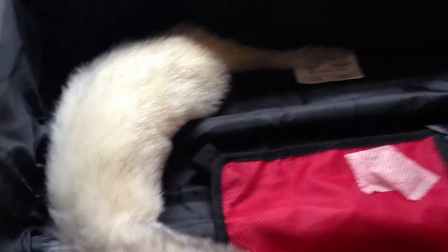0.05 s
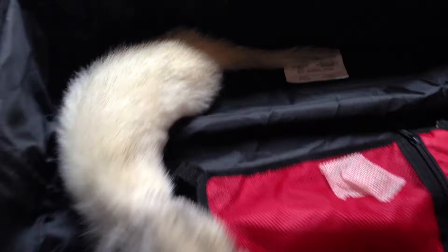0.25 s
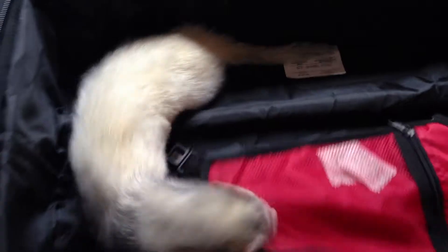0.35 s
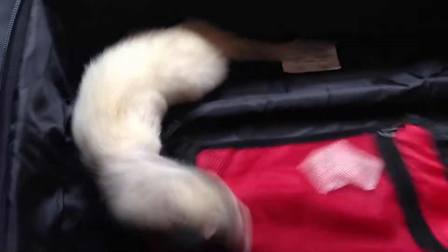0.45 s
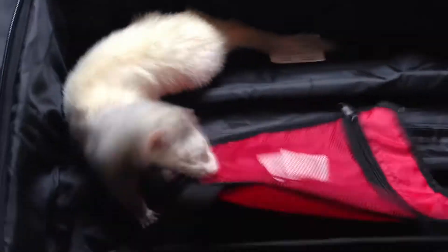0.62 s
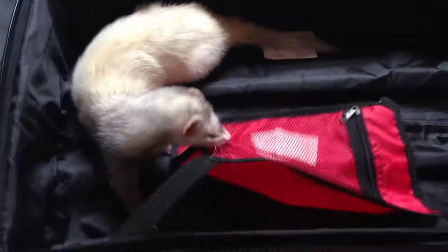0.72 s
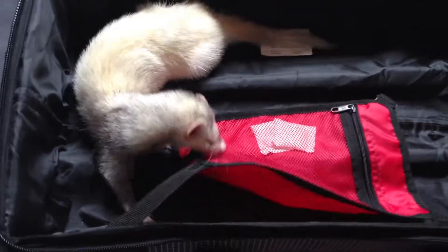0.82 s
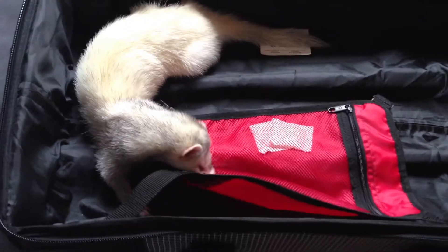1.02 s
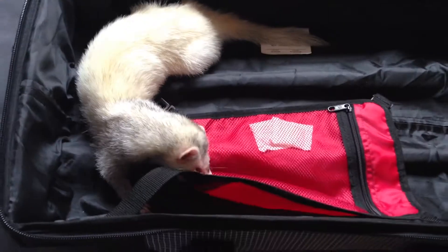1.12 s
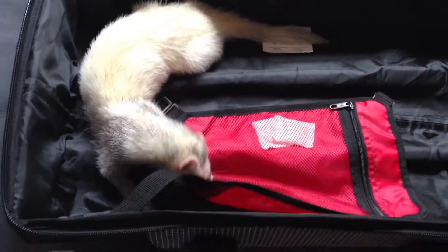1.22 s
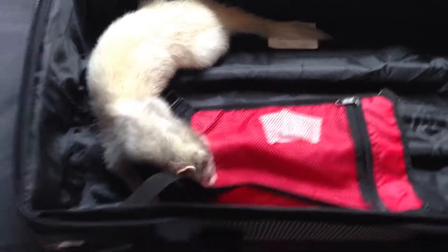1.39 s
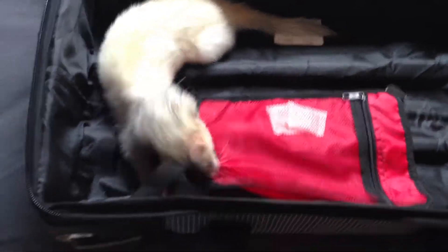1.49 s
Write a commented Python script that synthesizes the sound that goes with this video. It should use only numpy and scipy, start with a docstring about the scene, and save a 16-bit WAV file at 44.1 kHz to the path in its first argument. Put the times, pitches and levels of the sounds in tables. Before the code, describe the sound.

A ferret scrabbles over the nylon lining of a suitcase, with soft scuffs, claw ticks and tiny fabric squeaks. A quick cluster of light, hollow knocks follows, then the movement fades, heard up close in a quiet room.

```python
"""Ferret in a suitcase

A ferret rummages in an open suitcase, close by, in a quiet room. Claws tick on the fabric,
its body scuffs the nylon lining in short strokes, the ribbed weave squeaks, and paws and the
pocket flap knock on the shell. The room adds a short tail over a faint steady hiss."""
import sys
import numpy as np
from scipy import signal
from scipy.fft import rfft, irfft, next_fast_len
from scipy.io import wavfile

SR = 44100
rng = np.random.default_rng(int(sys.argv[2]) if len(sys.argv) > 2 else 0)


def transcribe(u):
    """Save the signal u as a 16-bit wav file named by the first command-line argument.

    u: samples, shape (n,) or (channels, n), limited to [-1, 1]; the rate is SR.
    q: integer samples, one column per channel.
    """
    v = np.clip(np.atleast_2d(u).T, -1, 1)
    q = np.round(v * 32767).astype(np.int16)
    wavfile.write(sys.argv[1], SR, q)


N = 68355

# claw ticks and taps: t/s, level/dB, f/Hz, t60/s
CLAW_TICKS = [(.102, -44.5, 4520, 0.0041), (.132, -42.5, 3970, 0.0051), (0.1638, -44, 6300, 0.0026),
              (.2185, -48, 1100, 0.011), (0.4255, -28.5, 3200, 0.0031), (0.4412, -28, 3650, .003),
              (0.6042, -34, 3660, 0.0061), (1.0315, -51, 1380, 0.021), (1.074, -51.5, 2960, 0.011),
              (1.323, -51, 3780, 0.016)]
# partials of a tick: f/pitch, level/dB
TICK_PARTIALS = [(.58, -4), (1, -1.5), (1.37, -5)]
# strokes over the lining: peak t/s, rise/s, fall/s, level/dB, panel trim/dB, sheen trim/dB
STROKES = [(0.147, 0.027, .025, -67.5, 2.5, 7.5), (0.219, .017, 0.011, -57, -6, -6),
           (.247, 0.032, 0.032, -52, -23, 2), (.345, 0.03, 0.024, -53.5, -1, 1),
           (0.424, 0.037, 0.031, -44.5, -7.5, -2), (0.468, 0.0087, 0.024, -39.5, 5.5, 3),
           (.502, 0.01, 0.021, -49.5, 10, -2), (0.536, 0.01, 0.014, -54, 13, 10),
           (0.57, 0.013, 0.025, -46, 2.5, 1), (0.631, 0.02, .017, -49.5, -14, 1),
           (0.667, 0.0034, 0.0078, -47, 9, 1.5), (.70, 0.014, 0.033, -52, 9, 4.5),
           (0.726, 0.012, 0.021, -46.5, 0, 0), (.78, 0.029, 0.026, -53.5, -1, 5.5),
           (0.834, 0.037, 0.046, -60.5, -20, 4.5), (1.055, .015, 0.016, -73, 11, -18),
           (1.297, 0.016, 0.011, -62.5, -9, -1), (1.325, 0.019, 0.015, -61, -18, 3.5),
           (1.41, 0.039, 0.013, -66, -25, 4), (1.545, 0.033, 0.032, -60, -10, 0)]
# nylon squeaks: peak t/s, half length/s, level/dB, f/Hz
NYLON_SQUEAKS = [(0.26, 0.019, -57.5, 2540), (0.326, .004, -54, 8300), (.553, .009, -51, 9600),
                 (.649, 0.0028, -49, 9730), (.727, .011, -46, 9750), (0.798, 0.07, -58.5, 1830),
                 (1.038, 0.018, -65.5, 1576), (1.299, 0.0061, -57, 880)]
# knocks on the shell: t/s, level/dB, contact cutoff f/Hz, relative floor thump/dB
SHELL_KNOCKS = [(.286, -49, 806, -6.5), (0.4246, -33, 2400, 2), (0.4419, -41.5, 2470, -38),
                (.4620, -33.5, 5000, -19), (0.4656, -21.5, 4900, -36), (.5728, -21, 3760, -31),
                (0.6677, -25, 840, -8.5)]
# shell modes: f/Hz, level/dB, t60/s
SHELL_MODES = [(248, -21.5, 0.069), (352.7, -8.5, 0.047), (482.5, -12.5, 0.036), (572, -19, 0.052),
               (731, -15, 0.038), (980, -13, 0.032), (1277, -10, 0.031), (1477, -10, 0.028),
               (2270, -3.5, 0.0057), (2727, -9, 0.0079), (4010, -11.5, 0.016), (4670, -0.5, 0.0067)]
# spectral shapes: f/Hz, level/dB
HISS_SHAPE = [(25, -20), (70, -1), (130, -4.5), (220, -4), (290, -0.5), (345, 4.5), (420, -2), (900, -2.5),
              (1800, -2), (4000, -3.5), (8000, -7.5), (15000, -9)]  # background
RUB_SHAPE = [(60, -39), (200, -35), (600, -6), (1100, -5), (1800, 0), (2300, 0), (2800, -1), (3400, -0.5),
             (4400, -2.5), (6500, -7.5), (10000, -14), (15000, -18.5)]  # rubbed nylon
PANEL_SHAPE = [(40, -41), (100, -10), (200, -10.5), (270, -3), (360, -0.5), (440, -3), (520, -0.5),
               (750, 1.5), (1100, -11.5), (1600, -5), (3000, -12), (15000, -48)]  # panel under the lining
SHEEN_SHAPE = [(60, -58), (2500, -45), (5500, 0.5), (8500, -3), (9700, -3), (11000, -3.5), (15000, -9)]  # hiss of the weave
CRACK_SHAPE = [(100, -24), (300, -5), (1300, 4.5), (4800, 0), (5800, -7), (15000, -12.5)]  # contact noise of a knock
ROOM_SHAPE = [(60, -26), (200, -9.5), (350, 1.5), (600, 2), (1100, 3), (1800, 0), (5000, -2), (15000, -1)]  # diffuse tail


def undb(db):
    """Decibels to gain."""
    return 10 ** (np.asarray(db) / 20)


def unit(x):
    """Scale to rms 1."""
    return x / np.sqrt(np.mean(x ** 2))


def colour(x, shape):
    """Minimum-phase filter through (f/Hz, level/dB) points."""
    size = next_fast_len(2 * N)
    hz, db = np.array(shape, float).T
    bins_hz = np.arange(size // 2 + 1) * SR / size
    log_gain = np.log(undb(np.interp(np.log(bins_hz + 1), np.log(hz), db)))
    cepstrum = irfft(log_gain, size)
    cepstrum[1:size // 2] *= 2
    cepstrum[size // 2 + 1:] = 0
    return irfft(rfft(x, size) * np.exp(rfft(cepstrum, size)), size)[:N]


def wander(rate_hz):
    """Smooth random curve, rms 1."""
    steps = np.arange(N) / SR * rate_hz
    return unit(np.interp(steps, np.arange(N), rng.standard_normal(N)))


def ring(t, hz, t60_s):
    """Struck mode: a decaying sine."""
    return np.sin(2 * np.pi * hz * t) * np.exp(-np.log(1000) * t / t60_s)


def add(out, start_s, x):
    """Mix x into out at start_s."""
    i = int(start_s * SR)
    out[i:i + len(x)] += x[:N - i]


def hiss(level_db=-64.5):
    """Faint steady background noise."""
    return undb(level_db) * unit(colour(rng.standard_normal(N), HISS_SHAPE))


def ticks(t):
    """A claw catches a thread or taps the lining: three fast-dying partials."""
    out, t = np.zeros(N), t[:SR // 12]
    for start_s, db, hz, t60_s in CLAW_TICKS:
        tick = sum((-1) ** k * undb(partial_db) * ring(t, hz * ratio, t60_s)
                   for k, (ratio, partial_db) in enumerate(TICK_PARTIALS))
        add(out, start_s, undb(db) * tick)
    return out


def friction(shape, snags_per_s=3500, spread_db=4.5, snag_share=0.41):
    """Threads snag and let go: dense uneven clicks over a smooth rub."""
    snags = (rng.random(N) < snags_per_s / SR) * rng.choice([-1, 1], N)
    snags = snags * undb(spread_db * np.minimum(rng.exponential(size=N), 4))
    grain = np.sqrt(snag_share) * unit(snags) + np.sqrt(1 - snag_share) * rng.standard_normal(N)
    return unit(colour(grain, shape))


def scuffs(t, panel_db=-7.5, sheen_db=-8, judder_db=1.16):
    """Each stroke rubs the nylon, drums the panel beneath and makes the weave hiss."""
    power = np.zeros((3, N))
    for peak_s, rise_s, fall_s, db, panel_trim_db, sheen_trim_db in STROKES:
        width_s = np.where(t < peak_s, rise_s, fall_s)
        swell = np.exp(-np.abs((t - peak_s) / width_s) ** 1.9)
        layer_db = db + np.array([0, panel_db + panel_trim_db, sheen_db + sheen_trim_db])
        power += swell * undb(layer_db[:, None]) ** 2
    layers = np.array([friction(RUB_SHAPE), friction(PANEL_SHAPE), friction(SHEEN_SHAPE)])
    stick_slip = undb(judder_db * wander(rate_hz=129.64))
    return (np.sqrt(power) * layers).sum(axis=0) * stick_slip


def squeaks(t, waver_hz=257):
    """Ribs of the weave zip over each other: a thin wavering whistle, higher on faster slides."""
    out = np.zeros(N)
    for peak_s, half_s, db, hz in NYLON_SQUEAKS:
        cycles = np.cumsum(hz + waver_hz * wander(rate_hz=700)) / SR
        swell = np.exp(-((t - peak_s) / half_s) ** 2)
        out += undb(db) * swell * np.sin(2 * np.pi * cycles)
    return out


def knocks(t, crack_s=0.0004, rattle_s=0.0093, low_cut_hz=270, thump_rise_s=0.002):
    """A blow rings the shell, shakes the lining and thumps the floor panel; soft ones lose treble."""
    out, t = np.zeros(N), t[:SR // 5]
    noise = unit(colour(rng.standard_normal(N), CRACK_SHAPE))
    burst = undb(-7.5) * np.exp(-t / crack_s) + undb(-12) * np.exp(-t / rattle_s)
    thump = ring(t, hz=190, t60_s=0.042) * (1 - np.exp(-t / thump_rise_s))
    for start_s, db, cutoff_hz, thump_db in SHELL_KNOCKS:
        scatter = rng.standard_normal((len(SHELL_MODES), 2))
        shell = np.zeros(len(t))
        for (hz, mode_db, t60_s), (level_dev, pitch_dev) in zip(SHELL_MODES, scatter):
            gain = rng.choice([-1, 1]) * undb(mode_db + 1.5 * level_dev)
            shell += gain * ring(t, hz * (1 + 0.013 * pitch_dev), t60_s)
        crack = burst * np.roll(noise, rng.integers(N))[:len(t)]
        contact = signal.butter(2, [low_cut_hz, cutoff_hz], "band", fs=SR, output="sos")
        blow = signal.sosfilt(contact, shell + crack)
        add(out, start_s, undb(db) * (blow + undb(thump_db) * thump))
    return out


def room(x, t, tail_db=-11.5, tail_t60_s=0.67, build_s=0.009, hollow_db=-9.5, hollow_t60_s=0.4):
    """Short diffuse tail plus the hollow air resonance of the case and its corner."""
    tail = rng.standard_normal(N) * np.exp(-np.log(1000) * t / tail_t60_s)
    tail *= 1 - np.exp(-(t / build_s) ** 2)
    tail = colour(tail / np.sqrt(np.sum(tail ** 2)), ROOM_SHAPE)
    hollow = ring(t, hz=360.6, t60_s=hollow_t60_s)
    hollow *= 2 * np.log(1000) / (hollow_t60_s * SR)  # unity gain at resonance
    return signal.fftconvolve(x, undb(tail_db) * tail + undb(hollow_db) * hollow)[:N]


def scene():
    """Ferret, hiss and room tail, mono."""
    t = np.arange(N) / SR
    ferret = scuffs(t) + squeaks(t) + knocks(t) + ticks(t)
    return (ferret + hiss() + room(ferret, t))[None]


def record(dry):
    """A small microphone drops the bass and cuts the top."""
    low_hz, top_hz = 140, 15400
    thin = signal.sosfilt(signal.butter(3, low_hz, "high", fs=SR, output="sos"), dry)
    return signal.sosfilt(signal.ellip(12, 0.1, 80, top_hz, fs=SR, output="sos"), thin)


dry = scene()
out = record(dry)
transcribe(out)
```